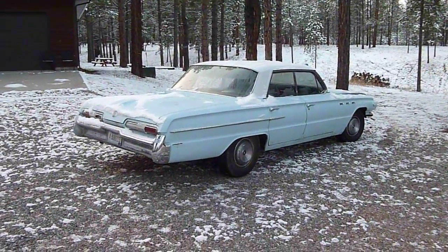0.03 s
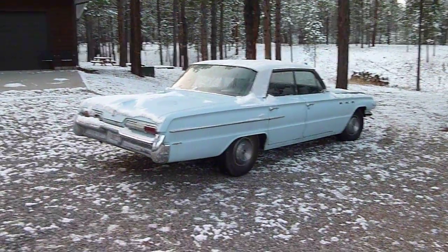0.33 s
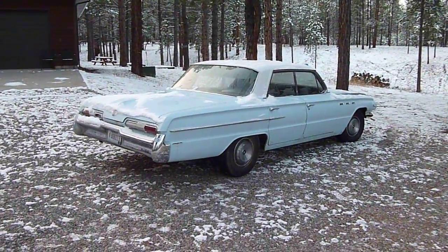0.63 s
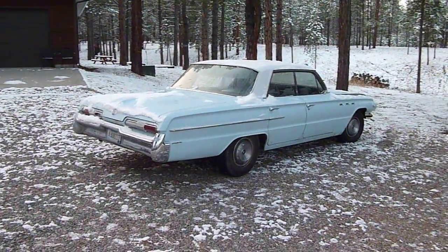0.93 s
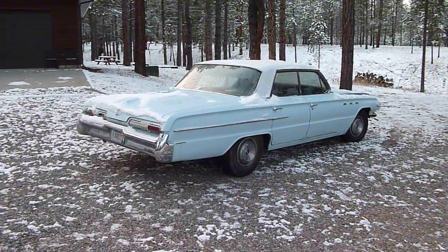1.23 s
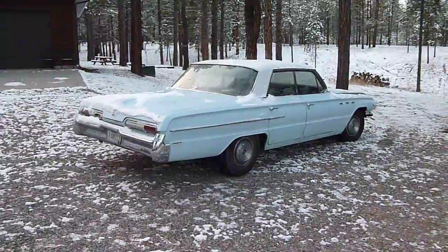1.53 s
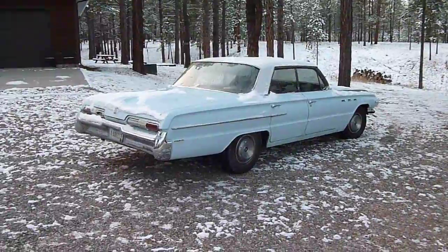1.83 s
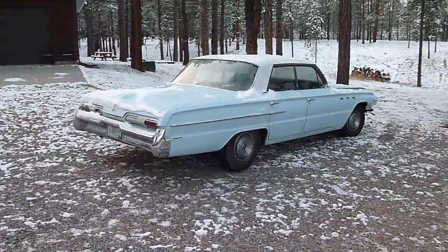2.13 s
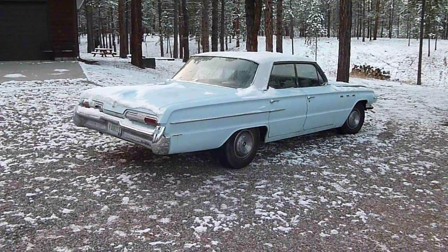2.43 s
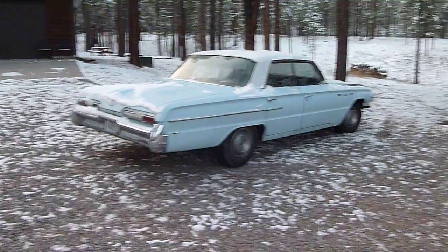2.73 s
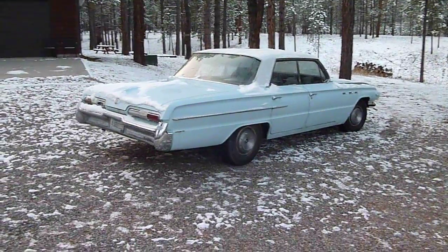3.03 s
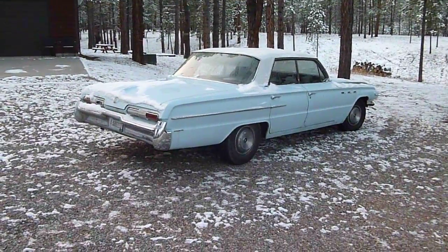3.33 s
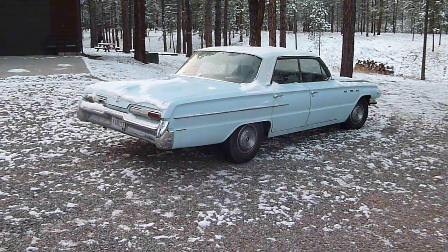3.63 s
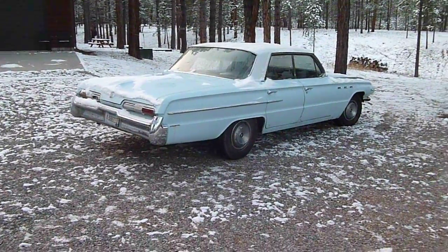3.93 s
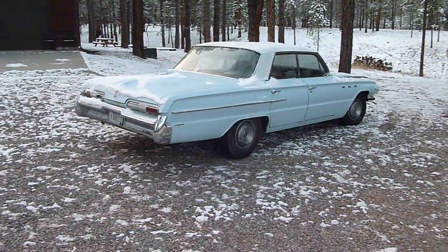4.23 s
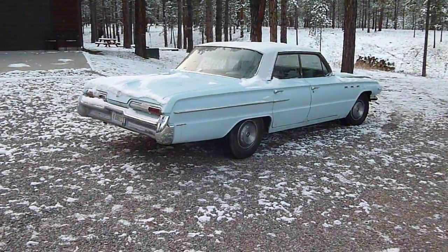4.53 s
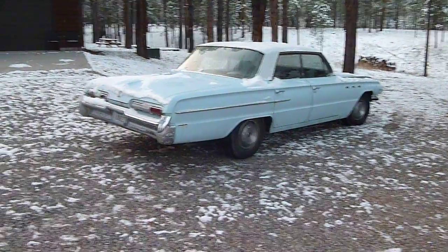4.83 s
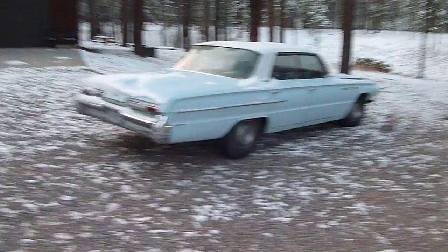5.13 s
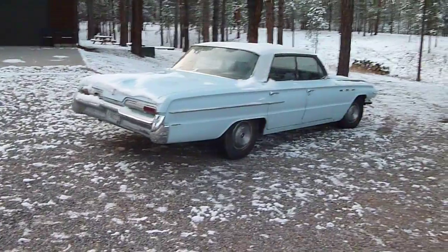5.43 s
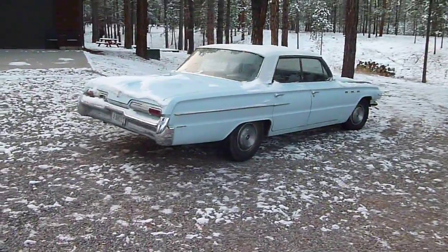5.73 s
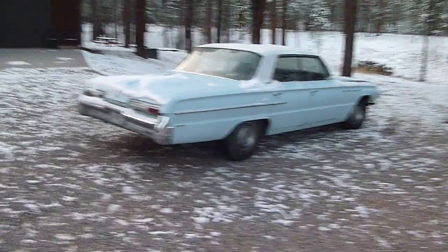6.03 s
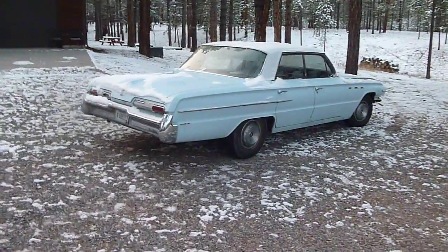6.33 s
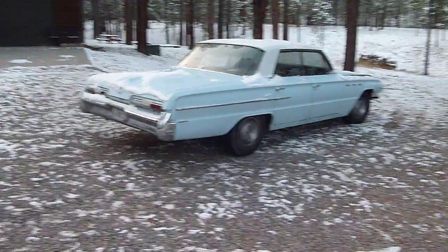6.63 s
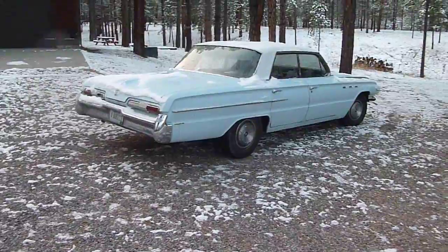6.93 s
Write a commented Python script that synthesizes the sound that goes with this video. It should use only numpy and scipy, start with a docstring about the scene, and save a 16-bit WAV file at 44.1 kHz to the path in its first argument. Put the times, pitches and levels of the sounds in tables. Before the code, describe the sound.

An old V8 car engine is running cold outdoors, with a low, ragged exhaust thump and a faint whirr. It opens with a pop and a short, raspy throttle blip, then sinks to a slow burble. It stumbles at about 1.3 seconds, and from 1.5 to 2.2 seconds a string of hollow pops spits from the tailpipe, leading into a second blip. The engine sags again, is blipped at 3.5 seconds, then stumbles and pops before a fourth blip at 4.8 seconds. From about 5 seconds it is revved hard: the separate thumps fuse into a loud, rising, rasping roar that overloads the microphone. At 5.9 seconds the throttle shuts with a low cough, and the engine winds down with a hollow rasp, falling in pitch but still running fast when the sound ends at about 7 seconds.

```python
"""An old V8 idles cold on a gravel lot, its firings thumping through the muffler and popping at the pipe.
It sags, stumbles and is caught by four throttle blips, each rasping at the tailpipe.
From about 5 s it is revved hard: the firings fuse into a roar that overloads the microphone.
At 5.9 s the throttle shuts with a cough and the engine runs down."""
import sys
import numpy as np
from scipy import signal
from scipy.fft import rfft, irfft, next_fast_len
from scipy.io import wavfile
from scipy.ndimage import uniform_filter1d, map_coordinates

SR = 44100
rng = np.random.default_rng(int(sys.argv[2]) if len(sys.argv) > 2 else 0)


def persist_wave(psi):
    """Save psi, clipped to +-1, as 16-bit WAV."""
    counts = np.round(np.clip(psi, -1, 1) * 32767).astype(np.int16)
    wavfile.write(sys.argv[1], SR, np.atleast_2d(counts).T)


N = 307818
TIME_S = np.arange(N) / SR
LIFT_OFF_S, FULL_FLOW_HZ = 5.91, 32.4  # engine speeds in Hz count four-stroke cycles


def amp(db):
    """Decibels to amplitude."""
    return 10 ** (np.asarray(db) / 20)


def unit(x):
    """x at rms 1."""
    return x / np.sqrt(np.mean(x ** 2) + 1e-20)


def even(x, window_s):
    """x at rms 1, slow swells removed."""
    width = max(int(window_s * SR), 8)
    power = uniform_filter1d(uniform_filter1d(x ** 2, width), width)
    return x / np.sqrt(np.abs(power) + 1e-6 * np.mean(x ** 2))


def during(start_s, end_s, fade_s):
    """1 from start to end, fading to 0 outside."""
    return np.clip(1 + np.minimum(TIME_S - start_s, end_s - TIME_S) / fade_s, 0, 1)


def along(points, x):
    """Interpolate (x, value) points on a log x axis."""
    at, value = np.transpose(points)
    return np.interp(np.log(x), np.log(at), value)


def wobble(rate_hz):
    """Smooth random curve."""
    knots = rng.standard_normal(int(N * rate_hz / SR) + 4)
    return map_coordinates(knots, [TIME_S * rate_hz])


def coloured(x, points):
    """Minimum-phase filter from (freq_hz, gain_db) points."""
    size = 2 * next_fast_len(N // 2 + 8192)
    bins_hz = np.fft.rfftfreq(size, 1 / SR)
    freq_hz, gain_db = np.transpose(points)
    gain = amp(np.interp(np.log(bins_hz + 1), np.log(freq_hz), gain_db, left=-90, right=-110))
    cepstrum = irfft(np.log(gain + 1e-6))
    cepstrum[1:size // 2] *= 2
    cepstrum[size // 2 + 1:] = 0
    return irfft(rfft(x, size) * np.exp(rfft(cepstrum)))[:N]


def flare(kicks, decay_s, rise_s):
    """Envelope that rises and dies away at each kick."""
    t = np.arange(SR // 10) / SR
    return signal.fftconvolve(kicks, np.exp(-t / decay_s) * (1 - np.exp(-t / rise_s)))[:N]


def puffs(kicks, decay_s, steady):
    """Turbulence flaring at each kick over a steady flow."""
    return (unit(flare(kicks, decay_s, decay_s / 5)) + steady) * rng.standard_normal(N)


def noise_swell(centre_s, width_s, level_db, colour):
    """Bell-shaped swell of coloured noise."""
    swell = np.exp(-((TIME_S - centre_s) / width_s) ** 2)
    return amp(level_db) * swell * even(coloured(rng.standard_normal(N), colour), 0.022)


# Throttle blips: open_s, shut_s, top_speed_hz, strength_db
THROTTLE_BLIPS = [(0.069, .21, 14, -1.5), (2.215, 2.385, 13.8, 1), (3.505, 3.612, 12.5, -0.3),
                  (4.79, 4.95, 15, -1)]
# Stumbles on a barely open throttle: start_s, end_s, held_speed_hz, boost_db
ENGINE_STUMBLES = [(1.21, 1.36, 5.1, 4.5), (1.595, 2.194, 6, 7), (4.68, 4.776, 5.2, 3.5)]
# Long rev: time_s, speed_hz
LONG_REV = [(4.95, 15), (5.12, 21.9), (5.3, 29.8), (5.45, 35.1), (5.62, 39.9), (5.86, 44.5), (6.2, 37.45),
            (6.6, 31.1), (6.98, 26)]
LEAD_S, HANG_S, SINK_S, NEAR_STALL_HZ = 0.04, 0.08, 0.91, 4.3


def engine_speed():
    """Speed in Hz: climbs at each blip, hangs, sinks towards a stall; then the long rev takes over."""
    speed = np.full(N, NEAR_STALL_HZ)
    for open_s, shut_s, top_hz, _ in THROTTLE_BLIPS:
        climb = np.interp(TIME_S, [open_s - LEAD_S, shut_s], [NEAR_STALL_HZ, top_hz])
        sink = np.exp(-np.maximum(TIME_S - shut_s - HANG_S, 0) / SINK_S)
        speed = np.maximum(speed, climb * sink)
    for start_s, end_s, held_hz, _ in ENGINE_STUMBLES:
        speed = np.maximum(speed, held_hz * during(start_s, end_s, 0.3))
    rev_s, rev_hz = np.transpose(LONG_REV)
    return np.where(TIME_S < rev_s[0], speed, np.interp(TIME_S, rev_s, rev_hz))


def blip_effort(attack_s=0.026, sag_db_per_s=27, release_db_per_s=152):
    """Exhaust drive: about 1 as a blip bites, sagging while held, dying once the throttle shuts."""
    effort = np.zeros(N)
    for open_s, shut_s, _, strength_db in THROTTLE_BLIPS:
        sag_db = sag_db_per_s * np.maximum(TIME_S - open_s, 0)
        release_db = release_db_per_s * np.maximum(TIME_S - shut_s, 0)
        effort += amp(strength_db - sag_db - release_db) * during(open_s, np.inf, attack_s)
    return effort


# Cylinders in firing order: pulling_db, coasting_db
CYLINDER_BALANCE = [(0.5, 3.5), (-4, 7), (-12.5, -21.5), (-17.5, 10.5), (-22, -4), (-6, -6.5), (-13.5, 6),
                    (-9, -8.5)]


def firings(cycle, uneven, scatter_db, jitter_s):
    """Eight kicks a cycle, weighted by cylinder, scattered in strength and time."""
    slot = np.floor(8 * cycle).astype(int)
    onsets = np.flatnonzero(np.diff(slot)) + 1
    pulling_db, coasting_db = np.array(CYLINDER_BALANCE)[slot[onsets] % 8].T
    cylinder_db = np.where(onsets < LIFT_OFF_S * SR, pulling_db, coasting_db)
    level_draw, time_draw = rng.standard_normal((len(onsets), 2)).T
    jittered = np.clip(onsets + (jitter_s * SR * time_draw).astype(int), 0, N - 1)
    return np.bincount(jittered, amp(uneven * cylinder_db + scatter_db * level_draw), N)


# Muffler main chamber: freq_hz, gain_db
CHAMBER_COLOUR = [(60, -48), (120, -15), (150, -5.5), (180, -5.5), (203, 1), (235, -2), (270, -17.5),
                  (450, -38), (600, -68)]
# Muffler with its higher resonances: freq_hz, gain_db
MUFFLER_COLOUR = [(53, -42.5), (90, -18.5), (112, -23), (127, -6), (144, -1.5), (199, -3), (247, -1.5),
                  (280, -10.5), (403, -18.5), (440, -13.5), (458, -15), (500, -41.5), (600, -41.5),
                  (780, -85), (1320, -120)]
# Low exhaust boom: freq_hz, gain_db
BOOM_COLOUR = [(25, -36), (34, -31), (43, -6), (52, 1), (63, 4.5), (76, -14.5), (100, 3), (120, -1),
               (180, -41)]
# Slow-running loudness: speed_hz, relative_db
BURBLE_BY_SPEED = [(4.4, -32.5), (5.5, -32), (7, -28.5), (9, -30), (13, -28.5)]


def burble(cycle, speed_hz, effort):
    """Ragged slow firings ring the muffler; the firing rate and the beat of one bank boom below."""
    kicks = firings(cycle, uneven=0.4, scatter_db=5.5, jitter_s=0.00058)
    gas = unit(kicks) + 0.82 * puffs(kicks, decay_s=0.014, steady=0.35)
    stumble_db = sum(db * during(start_s, end_s, 0.06) for start_s, end_s, _, db in ENGINE_STUMBLES)
    throttle = sum(during(open_s, shut_s + HANG_S / 2, 0.054) for open_s, shut_s, _, _ in THROTTLE_BLIPS)
    brightness = amp(3.5 + 10 * np.log2(speed_hz / 8) + 7.5 * throttle * np.minimum(effort, 1))
    muffled = unit(coloured(gas, CHAMBER_COLOUR)) + brightness * unit(coloured(gas, MUFFLER_COLOUR))
    loudness = np.hypot(amp(along(BURBLE_BY_SPEED, speed_hz) + stumble_db), amp(-21.5) * throttle)
    thumps = amp(3.5) * loudness * even(muffled, 0.039)
    swing = np.sin(2 * np.pi * 8 * cycle) + amp(-4) * np.sin(2 * np.pi * 5 * cycle)
    throb_db = -39.5 + 0.27 * stumble_db + 1.3 * wobble(8.7)
    throb = amp(throb_db) * even(coloured(swing, BOOM_COLOUR), 0.7)
    thud_gain = amp(-42 + 0.5 * stumble_db) + amp(-25) * effort ** 2
    thud = thud_gain * even(coloured(gas, BOOM_COLOUR), 0.11)
    return (thumps + throb + thud) * during(0, 5.02, 0.12)


# Tailpipe resonances: freq_hz, width_hz, gain_db
PIPE_MODES = [(681.6, 21, -6), (896, 24, -5), (976, 12, 4), (1155, 20, 4), (1200, 23, -27), (1713, 49, -7),
              (2576, 30, -7.5), (2835, 35, -15.5)]


def tailpipe(x):
    """x ringing the pipe's modes, alternating in sign."""
    size = next_fast_len(N + 8192)
    f = np.fft.rfftfreq(size, 1 / SR)
    response = 0
    for k, (freq_hz, width_hz, gain_db) in enumerate(PIPE_MODES):
        damping = 1j * f * width_hz
        response += (-1) ** k * amp(gain_db) * damping / (freq_hz ** 2 - f ** 2 + damping)
    return irfft(rfft(x, size) * response, size)[:N]


# Engine bay whirr: freq_hz, gain_db
WHIRR_COLOUR = [(290, -64), (500, -17.5), (679, -13.5), (801, -17), (957, 1.5), (1050, -18), (1140, 0.5),
                (1520, -23.5), (1750, -16.5), (2580, -27.5), (3260, -26), (6860, -31.5), (8380, -32.5),
                (10900, -63), (18400, -120)]


def chuff_and_whirr(cycle, speed_hz):
    """Soft puffs sound the tailpipe over the engine bay's whirr; both grow with speed."""
    kicks = firings(cycle, uneven=0.4, scatter_db=3, jitter_s=0.0005)
    chuff = even(tailpipe(puffs(kicks, decay_s=0.0046, steady=0.33)), 0.081)
    whirr = unit(coloured(rng.standard_normal(N), WHIRR_COLOUR))
    return amp(1.3 * np.log2(speed_hz / 10)) * (amp(-54.5) * chuff + amp(-48.5) * whirr)


# Hard firings as the engine stumbles or picks up: start_s, relative_db
HARD_FIRINGS = [(0.031, -23), (0.07, -20), (1.27, -36), (1.293, -30), (1.535, -30.5), (1.562, -25),
                (1.593, -28.5), (1.698, -24), (1.733, -26), (1.756, -24), (1.814, -24), (1.873, -24),
                (1.901, -22), (1.929, -24), (1.958, -25.5), (1.981, -23), (2.009, -20.5), (2.036, -22.5),
                (2.088, -30), (2.142, -21.5), (2.168, -26), (2.192, -19), (2.212, -13.5), (3.495, -25),
                (3.512, -27.5), (4.625, -34.5), (4.692, -31), (4.716, -27.5), (4.771, -27), (4.793, -23),
                (4.832, -19.5), (5.045, -19.5), (5.096, -19.5)]
# Hollow spit of the pipe: freq_hz, gain_db
SPIT_COLOUR = [(500, -28.5), (900, -5), (1180, 1.5), (1500, -18), (1800, -9.5), (2250, -22), (2650, -20.5),
               (3300, -25.5), (4500, -22), (5300, -27.5), (6000, -34.5), (8000, -44.5)]


def pops():
    """Late, hard firings spit from the pipe, ring it and thump the muffler."""
    kicks = np.zeros(N)
    for start_s, relative_db in HARD_FIRINGS:
        kicks[round(start_s * SR)] = amp(relative_db)
    envelope = flare(kicks, decay_s=0.0092, rise_s=0.0022)
    spit = envelope * unit(coloured(rng.standard_normal(N), SPIT_COLOUR))
    ring = tailpipe(envelope * rng.standard_normal(N))
    thump = coloured(kicks, MUFFLER_COLOUR)
    return amp(-6.5) * spit + amp(11.5) * ring + amp(41.5) * thump


def rev_flow(speed_hz, db_per_octave, lull_db, coasting_db, lull_delay_s=0.12, lull_width_s=0.18):
    """Layer gain in the long rev: grows up to full flow; positive lull_db ducks it after lift-off."""
    lull = np.exp(-((TIME_S - LIFT_OFF_S - lull_delay_s) / lull_width_s) ** 2)
    octaves = np.minimum(np.log2(speed_hz / FULL_FLOW_HZ), 0)
    gain_db = db_per_octave * octaves - lull_db * lull + coasting_db * during(LIFT_OFF_S, np.inf, 0.03)
    return amp(gain_db) * during(LONG_REV[0][0], np.inf, 0.014)


# Tailpipe rasp: freq_hz, gain_db
RASP_COLOUR = [(290, -36), (500, -0.5), (566, -9), (646, -10.5), (713, -1.5), (776, -8), (873, -12),
               (983, 1), (1060, -5.5), (1200, 0.5), (1430, -5.5), (1560, -15), (1730, -8.5), (2190, -19),
               (2400, -48), (3120, -39), (5280, -120)]
# Tailpipe hiss: freq_hz, gain_db
HISS_COLOUR = [(1700, -17), (2200, -4), (2650, -1.5), (3300, -8.5), (4400, -9.5), (5300, -12),
               (6600, -14.5), (7400, -26), (8400, -19.5), (9500, -61)]


def rasp(cycle, speed_hz, effort):
    """In blips and the long rev, each firing tears out of the pipe as a sharp front and a noise burst."""
    fronts = firings(cycle, uneven=0.85, scatter_db=0.9, jitter_s=0.00002)
    jet = 0.6 * puffs(fronts, decay_s=0.003, steady=0.45) + unit(fronts)
    ring = unit(tailpipe(jet))
    spits = firings(cycle, uneven=1.38, scatter_db=-0.5, jitter_s=0.00005)
    spray = puffs(spits, decay_s=0.0034, steady=0.35) + 0.3 * unit(spits)
    hiss = even(coloured(spray, HISS_COLOUR), 0.062)
    # Fast flow damps the pipe; in blips and on the overrun it rings hollow.
    rushing = even(unit(coloured(jet, RASP_COLOUR)) + 0.28 * ring, 0.036)
    hollow = even(unit(coloured(jet, SPIT_COLOUR)) + 0.5 * ring, 0.013)
    blips = amp(-30) * hollow * effort + amp(-45) * hiss * effort ** 2
    rev = amp(-26) * rushing * rev_flow(speed_hz, db_per_octave=9, lull_db=4, coasting_db=-0.6)
    rev += amp(-40) * hiss * rev_flow(speed_hz, db_per_octave=10, lull_db=-0.2, coasting_db=0.1)
    flow = np.minimum(speed_hz / FULL_FLOW_HZ, 1)
    overrun = amp(-34.5) * hollow * flow ** 2 * during(LIFT_OFF_S + 0.35, np.inf, 0.14)
    return blips + rev + overrun


def ping():
    """Brief narrow-band ping as the rev begins."""
    colour = [(1500, -36), (1750, -11), (1900, -13), (2200, -35)]
    return noise_swell(centre_s=4.85, width_s=0.0092, level_db=-29.5, colour=colour)


# Cycle harmonics 5 to 11: pulling_db, coasting_db
DRONE_HARMONICS = [(-21, -14), (-18, -28), (-32, -30), (-16.5, -23.5), (-21, -24), (-16.5, -18.5),
                   (-21.5, -23.5)]
# Exhaust resonance they sweep through: freq_hz, gain_db
DRONE_COLOUR = [(100, -31), (125, -12.5), (145, -7), (180, -2.5), (212, -2.5), (238, -3), (265, 1),
                (290, -4), (335, -9.5), (380, -8), (440, -7.5), (520, -31)]
# Muffler bark: freq_hz, gain_db
BARK_COLOUR = [(35, -12), (90, -15.5), (130, -5), (190, -10), (245, 7.5), (290, -0.5), (350, -5),
               (455, -1.5), (520, -17.5), (700, -35.5), (1200, -50.5)]


def roar(cycle, speed_hz, drone_db_per_octave=5):
    """At speed the firings fuse: a few cycle harmonics drone, the rest bark through the muffler."""
    pulling = during(5.1, LIFT_OFF_S - 0.035, 0.04)
    coasting = during(LIFT_OFF_S + 0.039, np.inf, 0.035)
    swell_db = drone_db_per_octave * np.log2(speed_hz / FULL_FLOW_HZ)
    drone = np.zeros(N)
    for harmonic, (pulling_db, coasting_db) in enumerate(DRONE_HARMONICS, 5):
        strength = amp(pulling_db) * pulling + amp(coasting_db) * coasting
        body_db = along(DRONE_COLOUR, harmonic * speed_hz) + swell_db + 1.1 * wobble(30)
        drone -= strength * amp(body_db) * np.sin(2 * np.pi * harmonic * cycle)
    kicks = firings(cycle, uneven=1.2, scatter_db=3.5, jitter_s=0.00016)
    gas = unit(kicks) + 0.59 * puffs(kicks, decay_s=0.005, steady=0.35)
    bark = even(coloured(gas, BARK_COLOUR), 0.16)
    bark *= rev_flow(speed_hz, db_per_octave=3.5, lull_db=9, coasting_db=-1)
    return amp(3.5) * drone + amp(-19.5) * bark


def cough():
    """Low cough as the throttle shuts."""
    colour = [(60, -23), (115, -10), (150, 4), (230, 3), (400, -19)]
    return noise_swell(centre_s=LIFT_OFF_S, width_s=0.044, level_db=-15, colour=colour)


def scene():
    """Mono mix; one crankshaft times all the running layers."""
    speed_hz, effort = engine_speed(), blip_effort()
    first_cylinder_s = 5.261
    cycle = np.cumsum(speed_hz) / SR
    cycle -= cycle[round(first_cylinder_s * SR)]
    accents = ping() + cough()
    exhaust = burble(cycle, speed_hz, effort) + roar(cycle, speed_hz) + rasp(cycle, speed_hz, effort)
    return (accents + exhaust + pops() + chuff_and_whirr(cycle, speed_hz))[None]


def record(dry):
    """Microphone overload: a slightly biased input flattens the loudest peaks, then a steep low-pass."""
    ceiling, offset, hardness, cutoff_hz = 0.31, 0.02, 12, 8000
    biased = dry + offset
    clipped = biased / (1 + np.abs(biased / ceiling) ** hardness) ** (1 / hardness)
    size = next_fast_len(N + 8192)
    lowpass = 1 / (1 + (np.fft.rfftfreq(size, 1 / SR) / cutoff_hz) ** 40)
    return irfft(rfft(clipped - offset, size) * lowpass, size)[..., :N] + offset


dry = scene()
out = record(dry)
persist_wave(out)
```